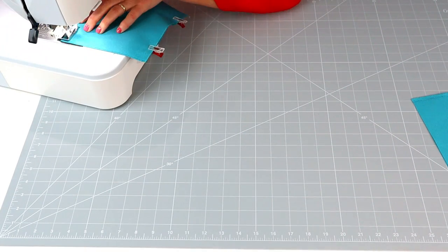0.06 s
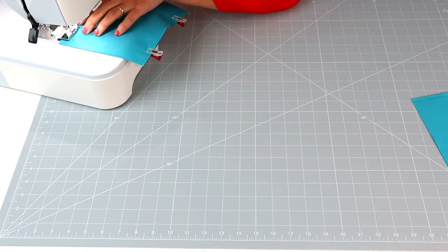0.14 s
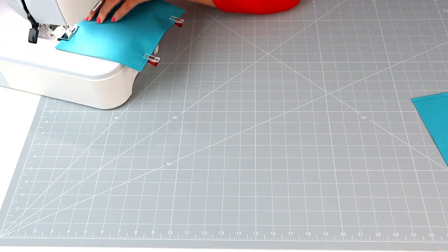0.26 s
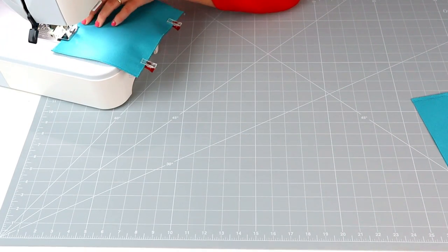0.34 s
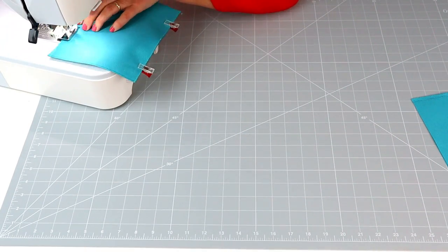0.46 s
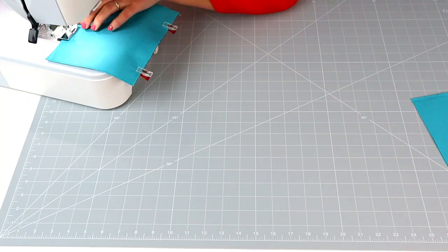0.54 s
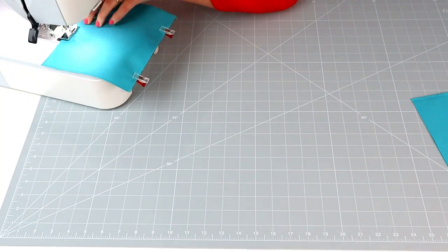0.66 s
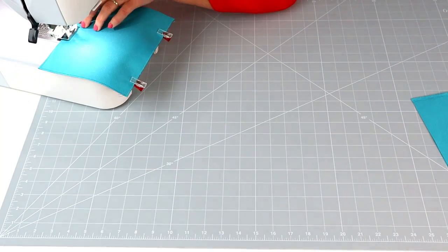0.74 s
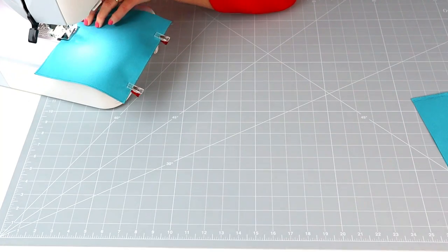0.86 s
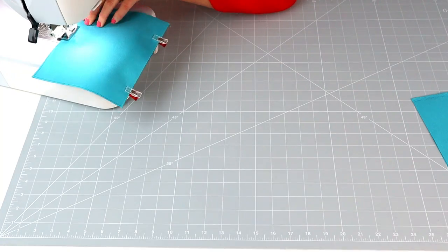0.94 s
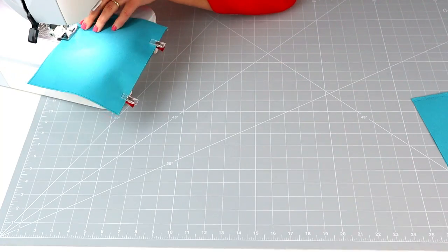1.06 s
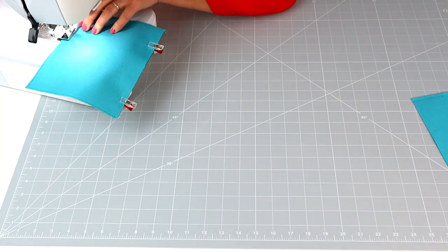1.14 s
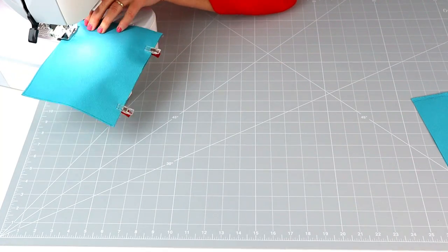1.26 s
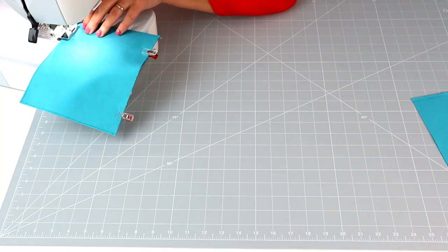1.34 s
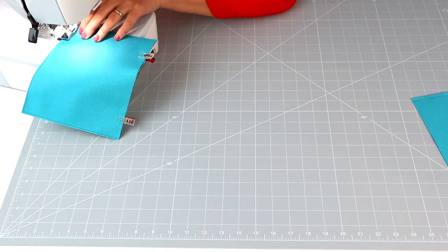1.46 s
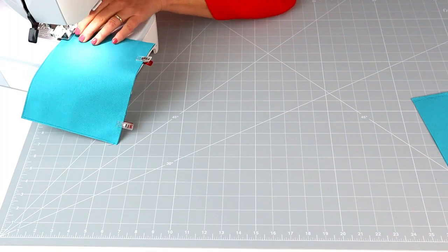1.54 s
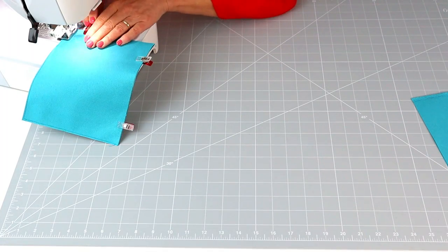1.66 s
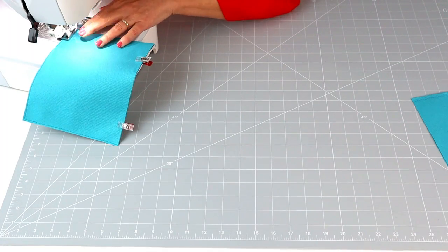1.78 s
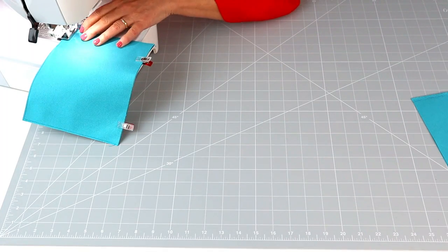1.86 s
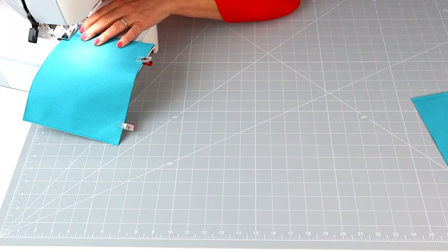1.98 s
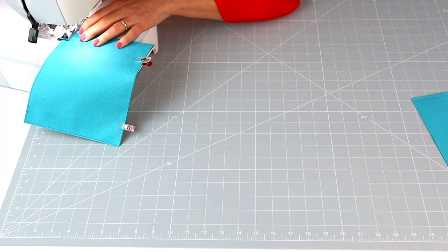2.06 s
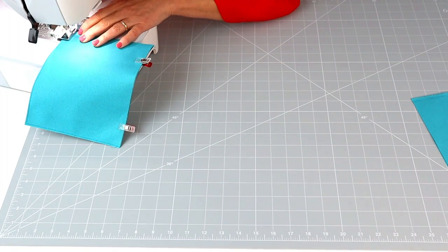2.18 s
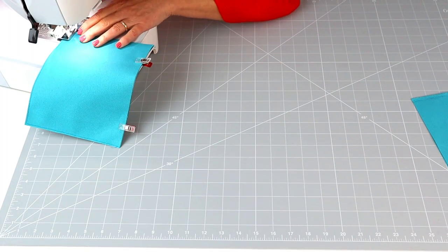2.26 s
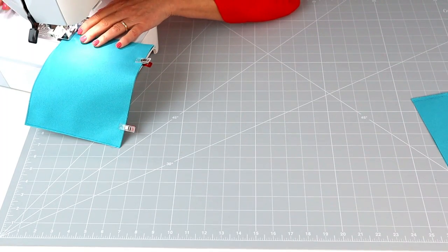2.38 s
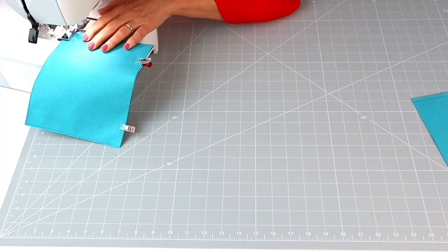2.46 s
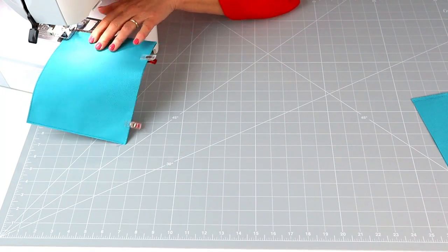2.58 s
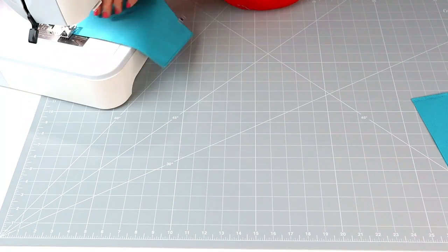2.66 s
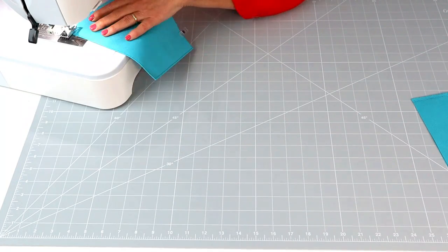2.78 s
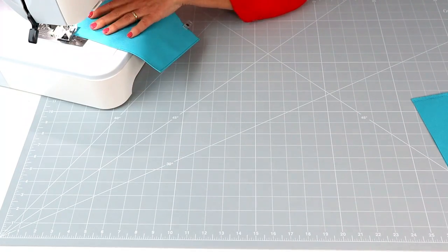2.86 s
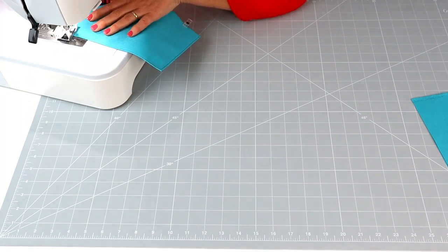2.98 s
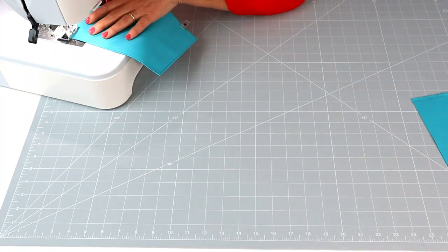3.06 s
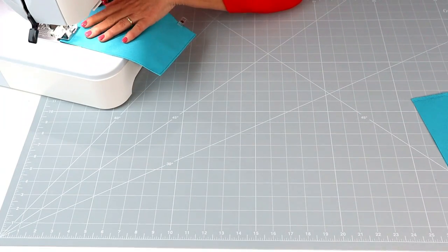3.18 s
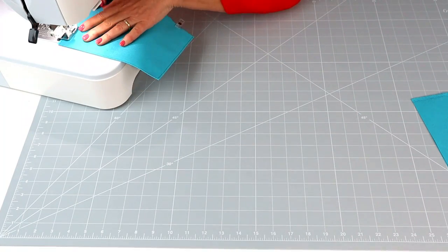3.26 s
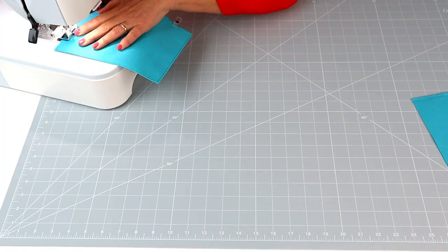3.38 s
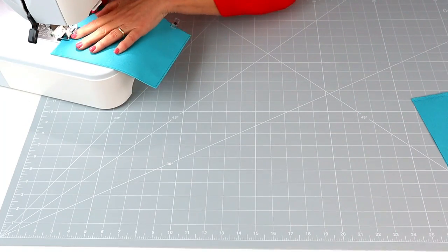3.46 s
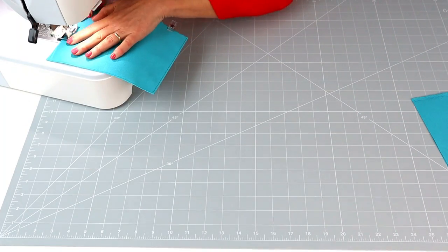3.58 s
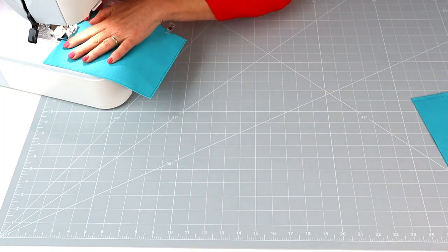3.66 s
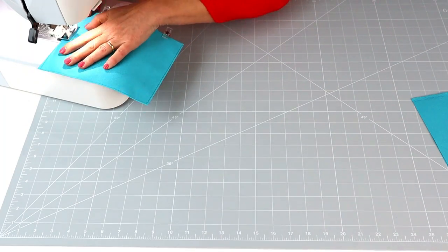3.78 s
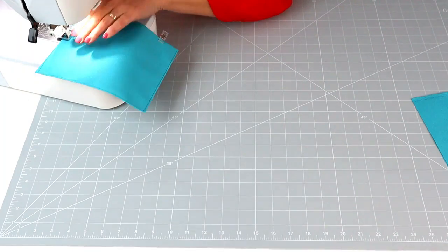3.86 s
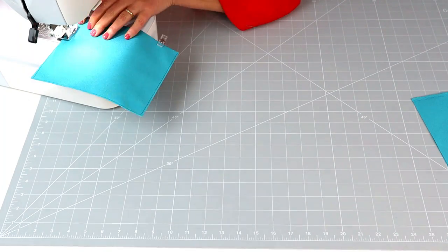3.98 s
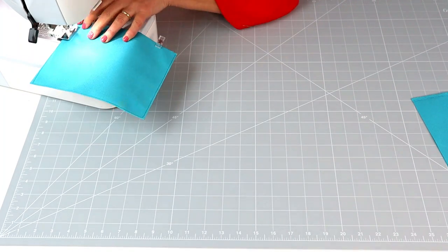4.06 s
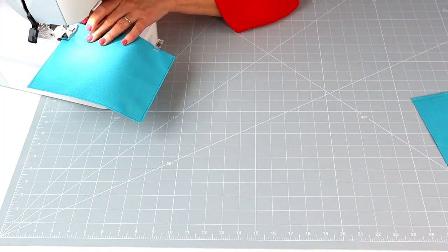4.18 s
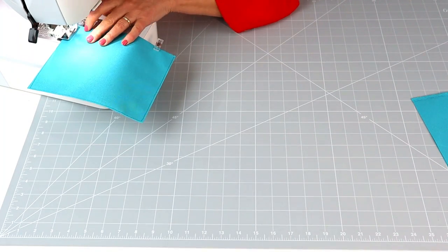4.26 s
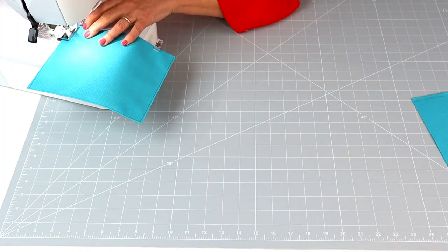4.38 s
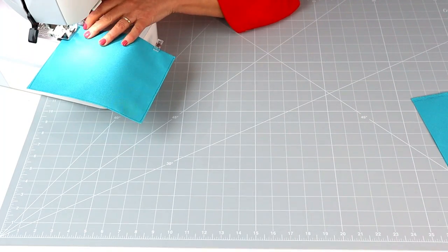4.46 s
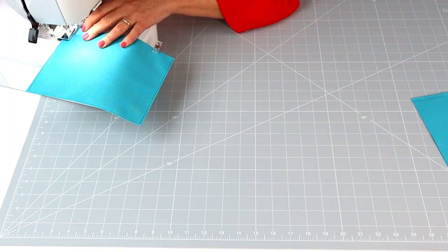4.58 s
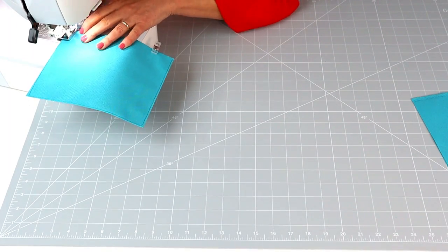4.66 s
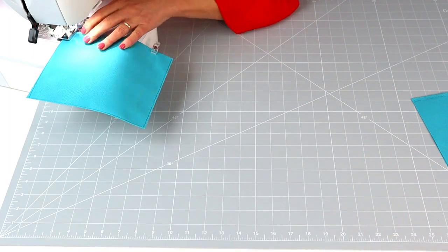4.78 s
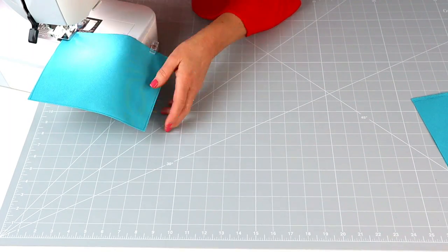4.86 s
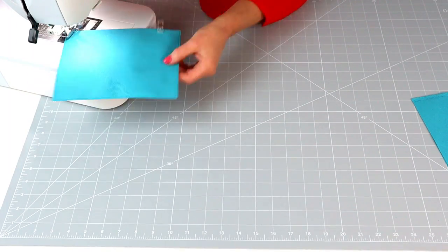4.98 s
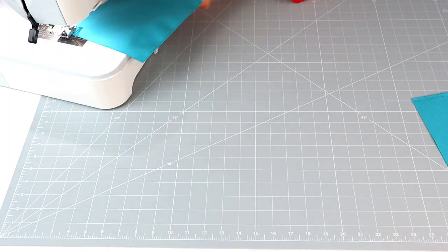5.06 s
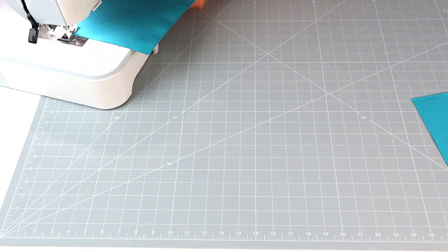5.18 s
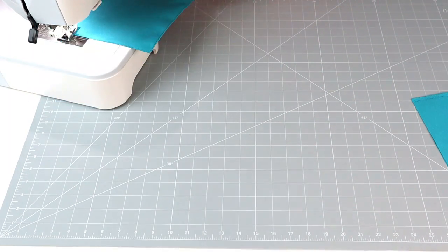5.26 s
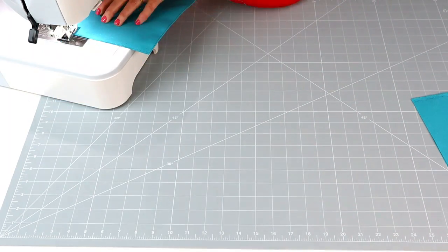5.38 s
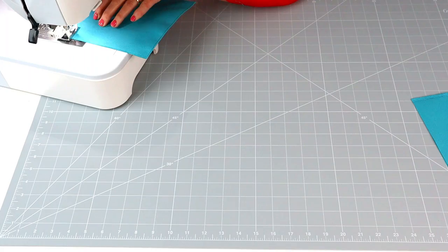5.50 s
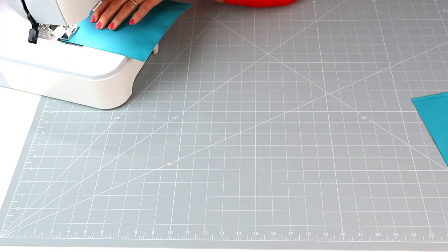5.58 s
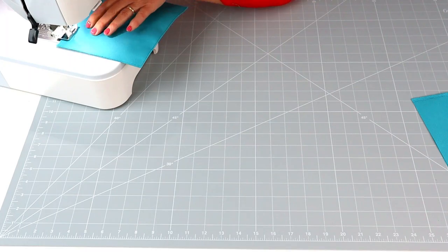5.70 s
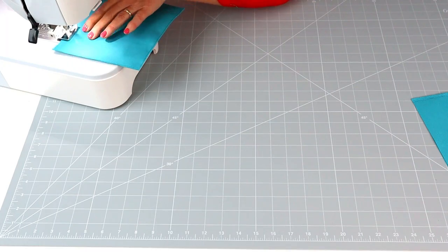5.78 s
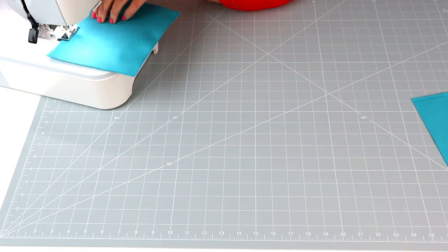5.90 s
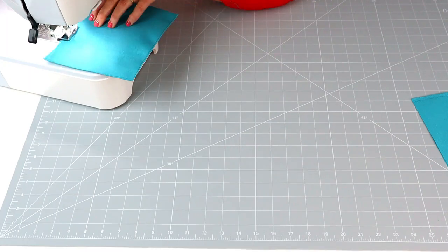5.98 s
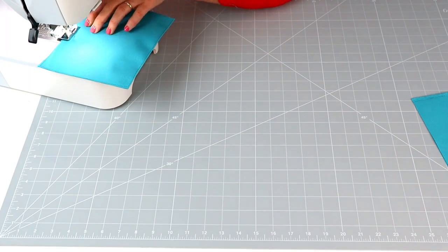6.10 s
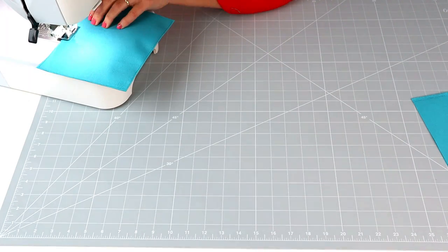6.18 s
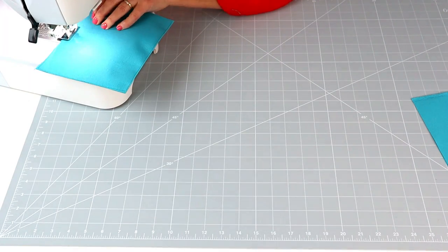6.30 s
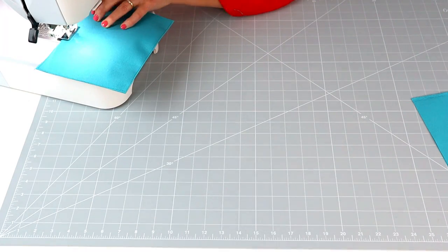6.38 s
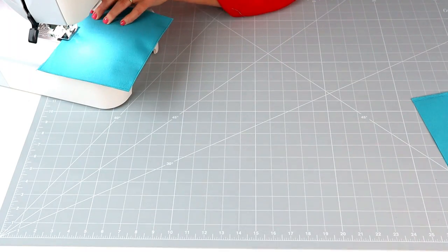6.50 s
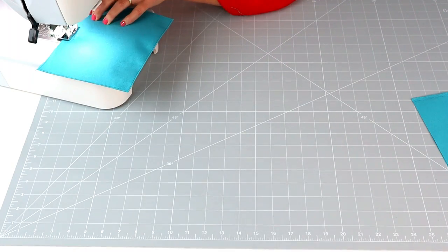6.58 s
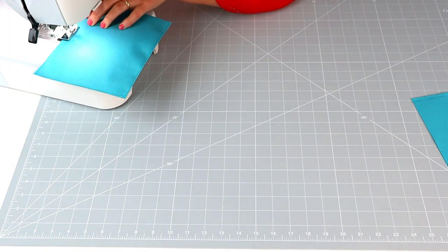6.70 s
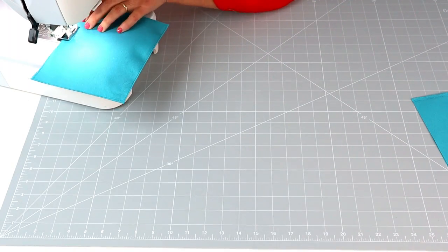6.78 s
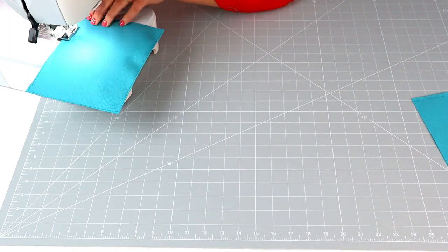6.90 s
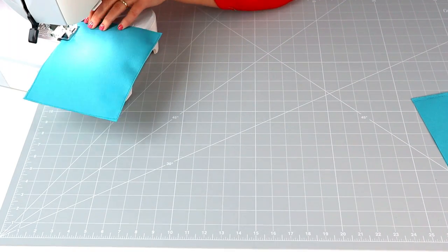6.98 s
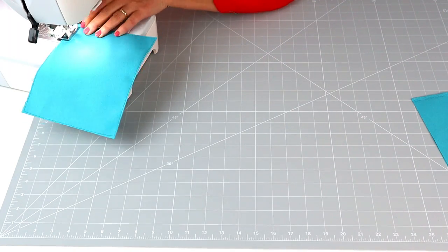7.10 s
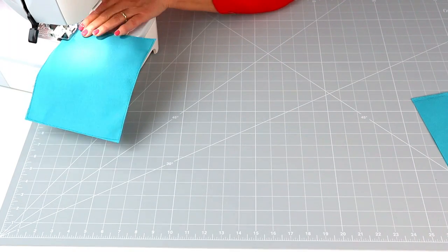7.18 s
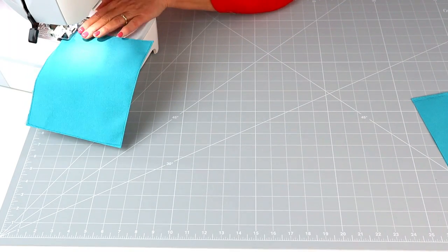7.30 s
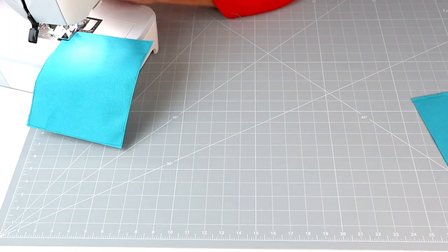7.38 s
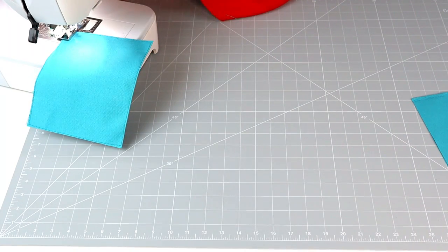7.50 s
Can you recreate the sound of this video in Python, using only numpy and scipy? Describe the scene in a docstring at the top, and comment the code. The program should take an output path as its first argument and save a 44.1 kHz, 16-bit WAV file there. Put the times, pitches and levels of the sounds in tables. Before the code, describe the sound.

A sewing machine's pulsing gear hum and metal rattle begin at once, break off for fabric turning, then return for a longer even run. A tiny burst follows amid busy handling, then two stronger runs with sharp ticks. Pauses hold soft rustles, dull knocks and metallic lever clicks. The room is quiet and dry with faint low tone; the close stereo microphone is bright on the left, dull on the right.

```python
"""A quiet room, at a table: a household sewing machine, heard sped up, stitches in short runs.
Each stitch beats dense gear clicks through the modes of the housing, over a low table thump.
In the pauses cloth slides and the presser-foot lever snaps; hands knock mostly there, and hard
parts tick in pauses and runs alike.
The left microphone port is open; the right one is muffled and adds a flickering diffuse copy."""
import sys
import numpy as np
from scipy import signal
from scipy.fft import rfft, irfft, next_fast_len
from scipy.io import wavfile

SR = 44100
rng = np.random.default_rng(int(sys.argv[2]) if len(sys.argv) > 2 else 0)


def inscribe(sig):
    """Save sig as 16-bit PCM at rate SR to the path in sys.argv[1].

    A 1-D sig is mono; a 2-D sig holds one channel per row.
    Samples are clipped to [-1, 1] before scaling.
    """
    pcm = np.round(np.clip(np.atleast_2d(sig).T, -1, 1) * 32767)
    wavfile.write(sys.argv[1], SR, pcm.astype(np.int16))


N = 332514
T = np.arange(N) / SR


def amp(db):
    """dB to gain."""
    return 10 ** (np.asarray(db) / 20)


def rms_one(x):
    """Scale to rms 1."""
    return x / np.sqrt(np.mean(x ** 2) + 1e-20)


def colour(x, spectrum):
    """Filter x by a gain curve, straight in dB over log frequency."""
    hz, db = np.transpose(spectrum)
    size = next_fast_len(len(x))
    log_hz = np.log(np.arange(size // 2 + 1) * SR / size + 1)   # 1 added to keep zero finite
    gain = amp(np.interp(log_hz, np.log(hz), db))
    return irfft(rfft(x, size) * gain, size)[:len(x)]


def resonate(x, hz, width):
    """One two-pole resonance, gain 1 on top; a narrower width in Hz rings longer."""
    r = np.exp(-np.pi * width / SR)
    feedback = [1, -2 * r * np.cos(2 * np.pi * hz / SR), r * r]
    return signal.lfilter([(1 - r * r) / 2, 0, (r * r - 1) / 2], feedback, x)


def modes(x, table):
    """Resonances side by side, signs alternating."""
    out = 0
    for k, (hz, width, db) in enumerate(table):
        out = out + (-1) ** k * amp(db) * resonate(x, hz, width)
    return out


def contacts(per_s, spread_db):
    """Dense random clicks of uneven size and random sign; rms 1."""
    sizes = amp(spread_db * np.minimum(rng.exponential(1, N), 5)) * rng.choice([-1, 1], N)
    struck = rng.random(N) < per_s / SR
    return rms_one(sizes * struck + 1e-9)


def burst(rise_ms, t60_ms, size):
    """A bell-shaped swell that starts 20 ms ahead, peaks rise_ms after the touch and decays."""
    ms = 1000 * T[:size] - 20 - rise_ms
    return np.where(ms < 0, np.exp(-1.2 * (ms / rise_ms) ** 2), amp(-60 * ms / t60_ms))


def burst_span(s):
    """First sample and length of a burst, at most a quarter second, for a touch at s seconds."""
    start = int((s - .02) * SR)
    return start, min(SR // 4, N - start)


def bursts(rows, damping=1):
    """Two envelopes per touch; the second is raised to a power, which scales its dB."""
    out = np.zeros((2, N))
    for s, peak_db, over_db, rise_ms, t60_ms in rows:
        i, size = burst_span(s)
        shapes = burst(rise_ms, t60_ms, size=size) ** [[1], [damping]]
        out[:, i:i + size] += shapes * amp([[peak_db], [peak_db + over_db]])
    return out


# Room tone, shaping of white noise before its level is set: f/Hz, level/dB
ROOM_TONE = [(15, -34), (25, 8.5), (75, 13.5), (470, -2.5), (553, -41), (921, -29), (1110, -22),
             (3640, -21), (5020, -23), (15600, -49)]


def room_tone():
    """The quiet room: steady noise, strongest at low frequencies."""
    return amp(-80.5) * rms_one(colour(rng.standard_normal(N), ROOM_TONE))


# Modes of the machine housing: f/Hz, width/Hz, lift or cut/dB
HOUSING_MODES = [(205, 34, -15), (359.7, 19.4, 5.5), (409.6, 16.5, 2), (500, 64, 5.5), (748, 130, 5.5),
                 (827, 23, 4), (913, 39, 7), (1116, 82, 7), (1320, 47, 6), (1695, 50, 1), (2550, 390, 1),
                 (3470, 130, 2.5), (4900, 150, 3.5), (5500, 250, 0.5), (7800, 96, 2), (10500, 200, 0.5),
                 (13500, 270, -1)]


def housing(x):
    """Stitching, knocks and cloth are lifted or thinned, mode after mode, by the housing."""
    for hz, width, db in HOUSING_MODES:
        x = x + (amp(db) - 1) * resonate(x, hz, width)
    return x


# Cloth slides, mostly in the pauses: start t/s, length/s, rustle level/dB, hiss level over rustle/dB
CLOTH_SLIDES = [(1.68, 0.27, -65.5, -15), (1.895, 0.63, -65, -12), (2.516, 0.54, -72, -3.5),
                (2.904, 0.19, -62, -2), (4.246, 0.31, -64, -7.5), (4.475, .18, -62.5, -11),
                (4.823, 0.18, -67.5, -13), (4.965, 0.28, -64.5, -5), (5.224, 0.23, -66, 0),
                (5.17, 0.092, -85, -4), (5.39, 0.25, -73.5, -16), (6.27, 0.39, -64, -7.5),
                (6.6, 0.22, -68.5, -10), (7.4, 0.31, -77.5, -10)]


def slides():
    """Rustle and hiss envelopes: each slide swells for about a third of its length, then fades."""
    out = np.zeros((2, N))
    for s, length, rustle_db, hiss_db in CLOTH_SLIDES:
        done = np.interp(T, [s, s + .32 * length, s + length], [0, 1, 0])
        swell = np.sin(np.pi / 2 * done) ** 2
        out += swell * amp([[rustle_db], [rustle_db + hiss_db]])
    return out


def knock_rise(t60_ms):
    """Rise time in ms: longer knocks also swell more slowly."""
    return 4.9 + .011 * t60_ms


# Knocks and scuffs of the hands; each layer trims these levels where it plays:
# touch t/s, peak level/dB, treble level over that/dB, t60/ms, ring f/Hz
HAND_KNOCKS = [(1.714, -49.5, -14, 31, 907), (1.816, -66, -7.5, 320, 860), (1.861, -49.5, -17, 65, 890),
               (1.876, -56, -12, 39, 886), (1.932, -52.5, -20, 80, 533), (1.992, -57, -6.5, 140, 885),
               (2.025, -47.5, -11.5, 34, 494), (2.112, -58, -32, 180, 422), (2.147, -51.5, -12.5, 65, 507),
               (2.185, -56.5, -38, 190, 485), (2.264, -52.5, -11, 69, 310), (2.307, -55, -32, 120, 680),
               (2.334, -57, -47, 93, 890), (2.416, -68.5, -13, 160, 610), (2.463, -52.5, -10.5, 130, 560),
               (2.479, -46.5, -2, 70, 564), (2.615, -67.5, -17, 120, 706), (2.654, -61.5, -7, 76, 334),
               (2.684, -53, -3, 235, 516), (2.7, -49, -13, 115, 513), (2.726, -53.5, -17, 134, 780),
               (2.77, -58, -13, 33, 337), (2.931, -65, -13, 190, 990), (2.963, -50.5, -3, 63, 495),
               (2.993, -48, -27, 39, 370), (4.299, -44, -33, 74, 878), (4.363, -57.5, -12, 33, 400),
               (4.373, -36.5, -18, 29, 409), (4.391, -56.5, -8.5, 120, 1130), (4.446, -55, -14, 62, 1130),
               (4.52, -54.5, -3.5, 95, 525), (4.597, -52, -36, 35, 890), (4.622, -51, -23, 35, 366),
               (4.836, -64.5, 1, 28, 510), (4.887, -53, -30, 19, 340), (5.013, -52.5, -18, 64, 842),
               (5.033, -54, -10, 23, 765), (5.069, -49, -4, 140, 890), (5.102, -51, -16, 84, 763),
               (5.118, -57.5, -5, 88, 760), (5.152, -56.5, -8.5, 51, 930), (5.267, -57.5, -8, 100, 890),
               (5.288, -48, -8, 74, 730), (5.316, -54.5, -18, 75, 350), (5.417, -66, -16, 71, 694),
               (5.493, -51.5, -28, 58, 927), (5.536, -44, -15, 54, 904), (6.315, -50, -13.5, 36, 484),
               (6.349, -59, -22, 61, 396), (6.408, -52.5, -13.5, 92, 394), (6.474, -56, -6, 42, 1140),
               (6.6, -65, 3.5, 125, 1330), (6.615, -45.5, -12, 30, 507), (6.703, -59, -29, 300, 365),
               (6.744, -45.5, -17, 36, 930), (6.788, -47.5, -16, 46, 910), (7.421, -42, -19.5, 33, 910)]


def knock_rings():
    """Each knock also favours one low resonance, set by where the hand lands."""
    out = np.zeros(N)
    for s, peak_db, over_db, t60_ms, hz in HAND_KNOCKS:
        i, size = burst_span(s)
        ring = rms_one(resonate(rng.standard_normal(SR // 4), hz, 26.0))[:size]
        envelope = burst(knock_rise(t60_ms), 1.03 * t60_ms, size=size)
        out[i:i + size] += amp(peak_db - 3.0) * envelope * ring
    return out


# Shaping of hand and cloth clicks ahead of the housing, body then treble: f/Hz, level/dB
HAND_BODY = [(120, -33), (200, -2.5), (377, 2), (626, 2), (749, 4), (1600, -7), (2320, -22.5), (2500, -23),
             (3250, -38), (5500, -120)]
HAND_TREBLE = [(1060, -14.5), (1800, 4), (2780, 0), (3480, 2), (4440, -8), (5410, -7.5), (8350, -21.5),
               (9300, -17), (15600, -41)]


def handling():
    """Cloth slides and hands knock: clicks under each gesture, ringing in the housing."""
    rustle, hiss = slides()
    rows = [(s, db, over_db, knock_rise(t60), t60) for s, db, over_db, t60, hz in HAND_KNOCKS]
    low, high = bursts(rows, damping=1.03)
    dull = rms_one(housing(colour(contacts(per_s=3600, spread_db=-2.0), HAND_BODY)))
    bright = rms_one(housing(colour(contacts(per_s=8500, spread_db=0.5), HAND_TREBLE)))
    return dull * (rustle + amp(-2.5) * low) + bright * (hiss + amp(6.0) * high)


# Lone sharp ticks of hard parts, in pauses and runs alike: t/s, peak level/dB
HARD_TICKS = [(0.042, -51), (1.0494, -51), (1.9905, -71), (2.0216, -64), (2.4175, -81), (2.463, -65),
              (2.4805, -46.5), (2.6871, -57), (2.771, -55), (2.9931, -50.5), (4.3336, -63), (4.3764, -66),
              (4.389, -56), (4.8365, -59), (4.96, -65.5), (4.9906, -65), (5.017, -72), (5.2877, -48.5),
              (5.3184, -49), (5.582, -51), (5.613, -50), (5.666, -45.5), (5.687, -47), (5.758, -46),
              (5.782, -49), (5.801, -43), (5.864, -45), (5.886, -44), (5.983, -44), (6.022, -45.5),
              (6.141, -51), (6.163, -49), (6.218, -49), (6.3175, -64), (6.3495, -76), (6.6176, -64),
              (6.743, -62), (6.8892, -44), (6.945, -47.5), (7.0146, -41.5)]
# Shaping of the tick noise: f/Hz, level/dB
TICK_COLOUR = [(300, -32), (2000, 4.5), (8000, -2.5), (15000, -18)]
# Ringing added to a tick: f/Hz, width/Hz, level over the snap/dB
TICK_MODES = [(5100, 200, 0), (8100, 270, 6), (11400, 200, 5)]


def ticks():
    """Hard parts tick: each sets off coloured noise that dies 60 dB in 34 ms."""
    clicks = np.zeros(N)
    for s, peak_db in HARD_TICKS:
        clicks[int(s * SR)] = amp(peak_db)
    envelope = signal.lfilter([1], [1, -amp(-60 / (0.034 * SR))], clicks + 1e-18)
    snap = colour(rng.standard_normal(N), TICK_COLOUR)
    snap = snap + modes(snap, TICK_MODES)
    return rms_one(snap) * envelope


# Presser-foot lever: touch t/s, spring peak level/dB, arm level over that/dB
LEVER_SNAPS = [(2.058, -55, -3), (3.004, -61.5, 7.5), (3.03, -54, 4), (4.52, -60, -8), (4.5668, -55, -3),
               (5.0994, -60.5, 0), (5.324, -60.5, 1), (5.3514, -55, 6), (6.645, -54.5, 1)]
# Modes of its spring, then of its arm: f/Hz, width/Hz, level/dB
SPRING_MODES = [(3500, 80, -6), (3780, 55, 0), (3960, 70, -8), (4110, 90, -7), (7000, 60, -26)]
ARM_MODES = [(370, 16, 11), (510, 30, -3), (845, 50, 0), (985, 50, -14)]


def lever():
    """The spring sings near 3.8 kHz over a rub, while the arm rings low and rings on."""
    spring, arm = bursts([(*row, 10.2, 43) for row in LEVER_SNAPS])   # rise ms, t60 ms
    shake = rng.standard_normal(N)
    rub = amp(-6) * rms_one(colour(rng.standard_normal(N), HAND_TREBLE))
    singing = spring * (rms_one(modes(shake, SPRING_MODES)) + rub)
    # the arm is shaken before its modes, so they outlast the envelope
    ringing = modes(arm * shake, ARM_MODES) / np.std(modes(shake, ARM_MODES))
    return singing + ringing


def stitch_count(per_s, uneven):
    """Stitches done so far, each a little early or late, and the beat depth, less when uneven."""
    turns = .571 + np.cumsum(per_s) / SR   # the first stitch is partly done at 0 s
    slip = rng.standard_normal(N // 500)
    turns = turns + uneven * np.interp(turns, np.arange(len(slip)), slip)
    return np.maximum(turns, 0), .71 - .46 * uneven


def stitch_beat(turns, depth, sharpness, spread_db):
    """A swell per stitch, each of its own strength; rms 1."""
    strength = rng.standard_normal(int(turns.max()) + 2)[np.round(turns).astype(int)]
    swell = np.exp(sharpness * (np.cos(2 * np.pi * turns) - 1))
    return rms_one(1 - depth + depth * swell * amp(spread_db * strength))


def needle(turns, spread_db):
    """One click as each stitch lands; rms 1."""
    lands = np.diff(np.floor(turns), prepend=0) > 0
    return rms_one(lands * amp(spread_db * rng.standard_normal(N)) * rng.choice([-1, 1], N))


def snippets(hz, turns, detune, jump, spread_db):
    """A tone in cross-faded snippets, one a stitch: each jumps in phase (turns), pitch and level; rms 1."""
    stitch = turns.astype(int)
    pitch_luck, phase_luck, level_luck = rng.standard_normal((int(turns.max()) + 2, 3)).T
    phase = 2 * np.pi * np.cumsum(hz + 0 * T) / SR
    centre = np.interp(np.arange(len(pitch_luck)), turns, phase)
    start = centre + 2 * np.pi * jump * np.cumsum(phase_luck)
    fade = np.sin(np.pi / 2 * (turns % 1)) ** 2
    out = 0
    for k, window in ((stitch, 1 - fade), (stitch + 1, fade)):
        angle = (phase - centre[k]) * (1 + detune * pitch_luck[k]) + start[k]
        out = out + window * amp(spread_db * level_luck[k]) * np.sin(angle)
    return rms_one(out)


def wandering(hz):
    """A pitch that drifts slowly: new random goals 5 times a second, 3.5 % spread."""
    knots = np.arange(0, N / SR + 1, 1 / 5)
    return hz * (1 + .035 * np.interp(T, knots, rng.standard_normal(len(knots))))


# Table modes, gone through twice: f/Hz, width/Hz, level at each pass/dB
TABLE_MODES = [(85.5, 13, 9), (161.4, 47, 7)]


def table_thump(turns, depth, lower_hz, upper_hz, upper_db):
    """Two motor tones pulsing with the stitches over table rumble; rms 1."""
    beat = stitch_beat(turns, .9 * depth, sharpness=1.8, spread_db=1.2)
    rumble = rms_one(modes(modes(beat * rng.standard_normal(N), TABLE_MODES), TABLE_MODES))
    lower = snippets(wandering(lower_hz), turns, detune=.04, jump=.11, spread_db=1.5)
    upper = snippets(wandering(upper_hz), turns, detune=.04, jump=.11, spread_db=1.5)
    return rms_one(beat * (lower + amp(upper_db) * upper) + amp(-3.0) * rumble)


# Shaping of the hum clicks ahead of the housing: f/Hz, level/dB
HUM_COLOUR = [(120, -18.5), (200, -6), (502, -1.5), (633, -4), (887, -4.5), (997, -6), (1120, -7),
              (1540, -12), (2500, -23), (3250, -47), (5500, -120)]
# Housing modes that hold a tone: f/Hz, level over the hum/dB
SINGING_MODES = [(335, -17), (420, -15), (505, -17.5), (850, -11.5), (900, -12)]


def housing_hum(turns, depth):
    """Gear clicks swell with each stitch through the housing, and some modes sing; rms 1."""
    beat = stitch_beat(turns, .5 * depth, sharpness=3.3, spread_db=2.0)
    landings = np.abs(needle(turns, spread_db=-2.0))
    clicks = beat * contacts(per_s=8000, spread_db=1.13) - amp(-11.5) * landings
    hum = rms_one(housing(colour(clicks, HUM_COLOUR)))
    singing = 0
    for hz, db in SINGING_MODES:
        singing = singing + amp(db) * snippets(hz, turns, detune=.015, jump=.14, spread_db=1.5)
    return rms_one(hum + singing)


# Shaping of the metal clicks ahead of the housing: f/Hz, level/dB
RATTLE_COLOUR = [(1060, -39), (1800, -3.5), (3090, -5), (3540, -4.5), (4600, -10.5), (5610, -8.5),
                 (7160, -18), (13300, -26), (15600, -32.5)]


def metal_rattle(turns, depth):
    """Metal parts click densely, swelling with each stitch, plus a needle click; rms 1."""
    beat = stitch_beat(turns, 0.7 * depth, sharpness=1.6, spread_db=2.0)
    clicks = beat * contacts(per_s=9000, spread_db=2.5) + amp(-19.5) * needle(turns, spread_db=-2.5)
    return rms_one(housing(colour(clicks, RATTLE_COLOUR)))


# Pedal effort, one list a run, as the level of the housing hum: t/s, level/dB
PEDAL_EFFORT = [
    [(0, -44), (.03, -50.5), (.055, -42), (.08, -40.5), (.15, -40.5), (.2, -44), (.75, -43.5), (1.652, -43),
     (1.7, -51), (1.76, -67)],
    [(3.088, -47.5), (3.11, -45.5), (3.135, -43), (3.26, -43.5), (3.4, -42.5), (4.25, -43), (4.29, -54)],
    [(4.64, -61), (4.68, -47.5), (4.77, -45), (4.848, -57), (4.86, -66)],
    [(5.51, -59.5), (5.55, -50), (5.64, -40), (5.72, -39), (6.25, -41), (6.28, -54.5), (6.31, -58)],
    [(6.745, -48), (6.78, -51.5), (6.84, -41.5), (6.95, -37.5), (7.35, -43), (7.432, -52), (7.49, -64.5)],
]


def pedal_effort():
    """Hum level in dB, and a gate that is open during each run, with 10 ms fades."""
    s, db = np.transpose([row for run in PEDAL_EFFORT for row in run])
    gate = 0
    for run in PEDAL_EFFORT:
        to_edge = np.minimum(T - run[0][0] + .01, run[-1][0] + .01 - T)
        gate = gate + np.clip(to_edge / .01, 0, 1)
    return np.interp(T, s, db), gate


# One row a run: stitch rate/per s, unevenness of spacing/stitches, lower and upper tone f/Hz,
# upper level over lower/dB, then at the run's top effort: thump level and rattle level over the hum/dB,
# table sway level/dB
STITCH_RUNS = [(42.77, .04, 106, 126, 1.5, -11, -10.5, -66), (35.13, .3, 104, 139, 4, -13, -10.5, -65.5),
               (35.85, 0.41, 120, 135, -11, -12, -12, -76), (37.68, .3, 111, 140, 1, -12, -10, -77),
               (38.9, .25, 109, 140, 0.5, -10.5, -10, -61)]


def per_run():
    """The run columns in time, each held until the next run starts, and each run's top effort in dB."""
    which = np.searchsorted([run[0][0] - .01 for run in PEDAL_EFFORT[1:]], T)
    top_db = np.array([max(db for s, db in run) for run in PEDAL_EFFORT])
    return np.array(STITCH_RUNS)[which].T, top_db[which]


def stitching():
    """The machine runs: housing hum, table thump, metal rattle and sway follow the pedal effort."""
    body_db, gate = pedal_effort()
    columns, top_db = per_run()
    per_s, uneven, lower_hz, upper_hz, upper_db, thump_db, rattle_db, sway_db = columns
    slack_db = body_db - top_db
    turns, depth = stitch_count(per_s, uneven)
    # thump and rattle lose extra dB for each dB of effort below the run's top
    thump_gain = amp(thump_db + .22 * slack_db)
    rattle_gain = amp(rattle_db + .27 * slack_db)
    parts = housing_hum(turns, depth)
    parts = parts + thump_gain * table_thump(turns, depth, lower_hz, upper_hz, upper_db)
    parts = parts + rattle_gain * metal_rattle(turns, depth)
    # the table rocks once a stitch
    sway = snippets(per_s, turns, detune=.05, jump=.12, spread_db=2.0)
    return gate * (amp(body_db) * parts + amp(sway_db + slack_db) * sway)


# Diffuse sound at the right port: f/Hz, level/dB
DIFFUSE_COLOUR = [(100, -26), (700, -17), (2000, -25), (4100, -29), (9000, -28), (14000, -25)]


def diffuse_copy(sound):
    """Sound scattered over a 50 ms t60 noise tail, fading and flipping all the time."""
    tail = T[:SR // 10]
    scatter = rng.standard_normal(len(tail)) * amp(-60 * tail / .05)
    scattered = signal.fftconvolve(sound, scatter / np.linalg.norm(scatter))[:N]
    steps = int(80 * N / SR)   # 80 new random gains a second
    flicker = np.interp(T, np.linspace(0, N / SR, steps), rng.standard_normal(steps))
    return colour(scattered, DIFFUSE_COLOUR) * rms_one(flicker)


# Direct sound at the right port, ahead of its low-pass: f/Hz, level/dB
DIRECT_COLOUR = [(30, -2.5), (90, 0), (200, 0), (700, -2), (2000, -5), (4000, -8), (9000, -10)]


def muffled_port(sound):
    """The covered port acts as a one-pole low-pass at 145 Hz."""
    r = np.exp(-2 * np.pi * 145 / SR)
    return amp(3.3) * signal.lfilter([0, 1 - r], [1, -r], colour(sound, DIRECT_COLOUR))


def scene():
    """All sources reach both ports; the right one is muffled and also catches a diffuse copy."""
    hands = handling() + knock_rings() + lever()
    sound = room_tone() + hands + ticks() + stitching()
    return np.array([sound, muffled_port(sound) + diffuse_copy(sound)])


# Microphone hiss before the top is cut, one row a channel, left then right: level/dB
MICROPHONE_HISS = [
    [-87.5],
    [-99],
]


def record(dry):
    """Each microphone channel adds its own hiss; the top is cut steeply above 15.8 kHz."""
    wet = dry + amp(MICROPHONE_HISS) * rng.standard_normal(dry.shape)
    top_cut = signal.ellip(12, .3, 55, 15794, fs=SR, output="sos")
    return signal.sosfilt(top_cut, wet)


dry = scene()
out = record(dry)
inscribe(out)
```